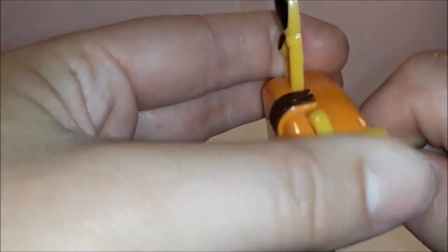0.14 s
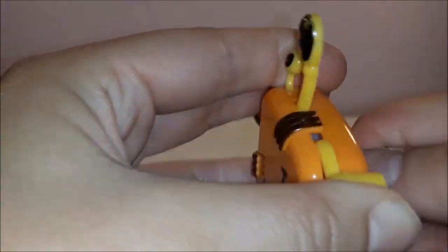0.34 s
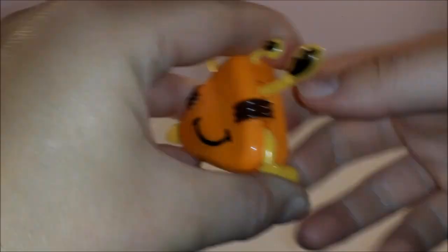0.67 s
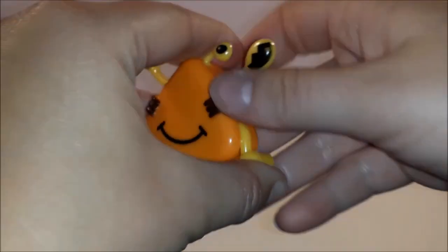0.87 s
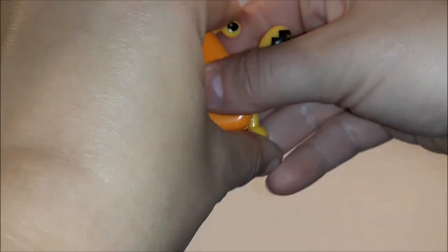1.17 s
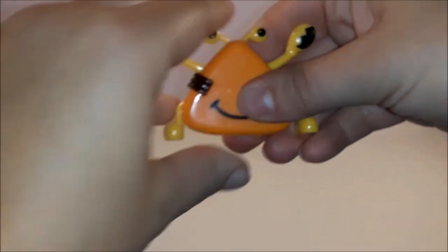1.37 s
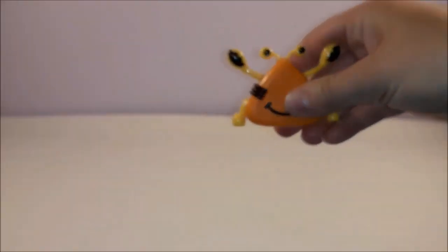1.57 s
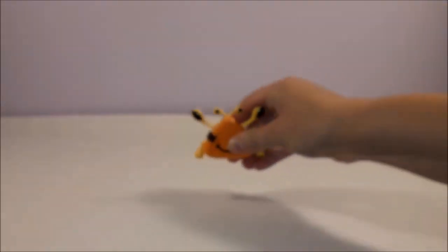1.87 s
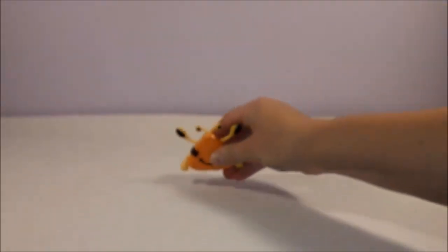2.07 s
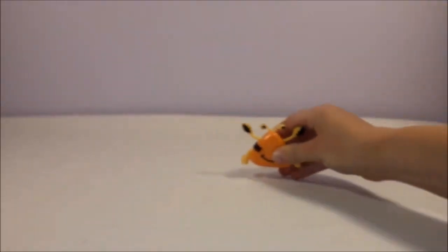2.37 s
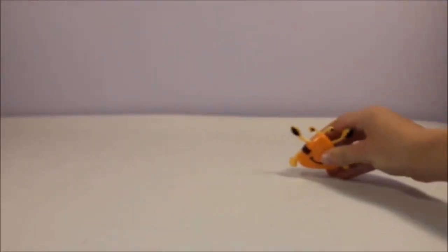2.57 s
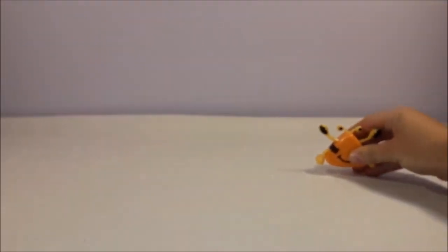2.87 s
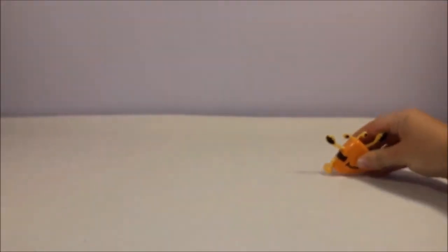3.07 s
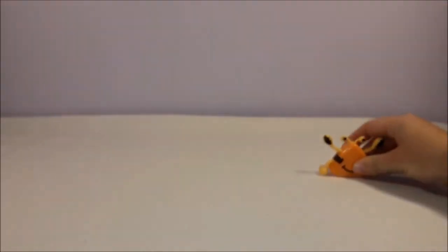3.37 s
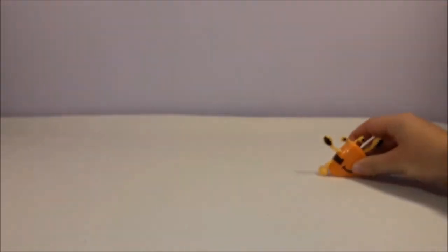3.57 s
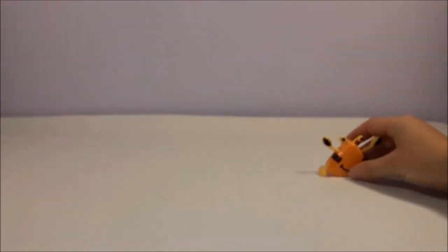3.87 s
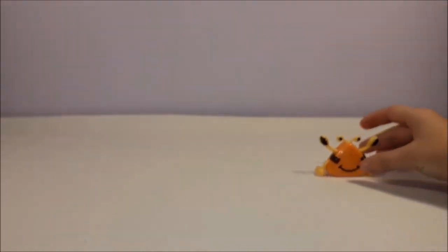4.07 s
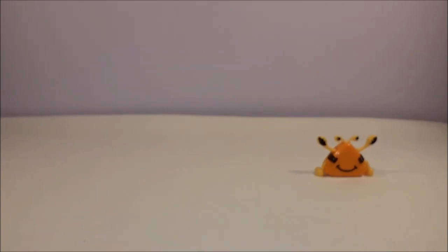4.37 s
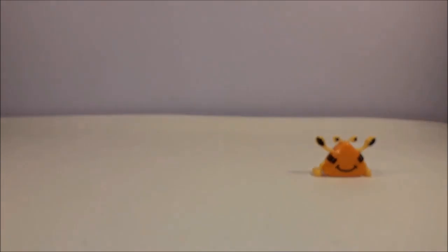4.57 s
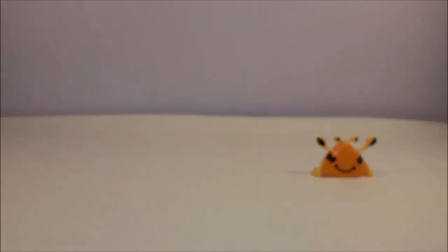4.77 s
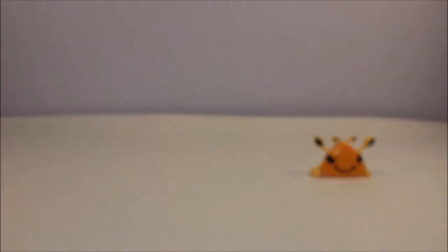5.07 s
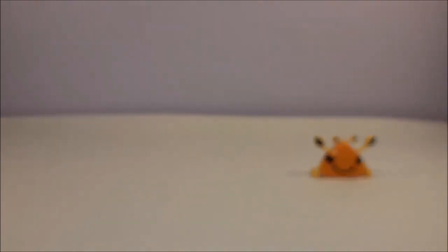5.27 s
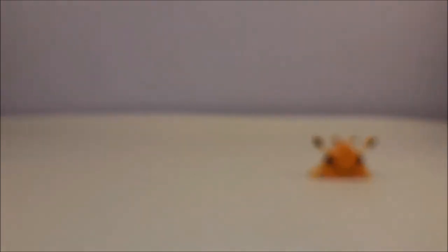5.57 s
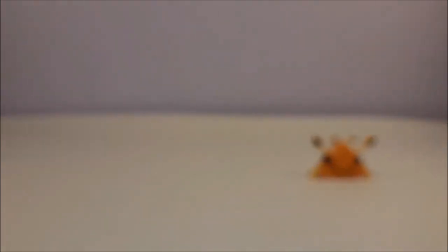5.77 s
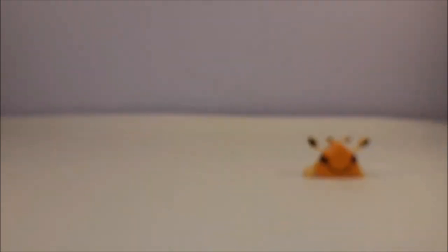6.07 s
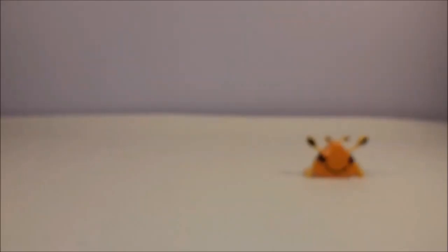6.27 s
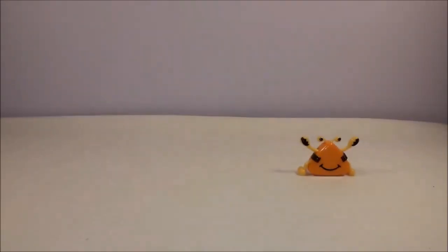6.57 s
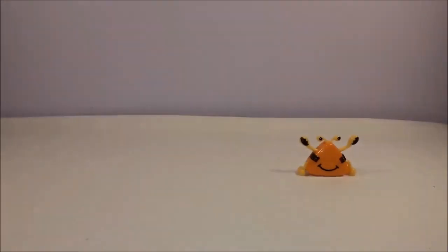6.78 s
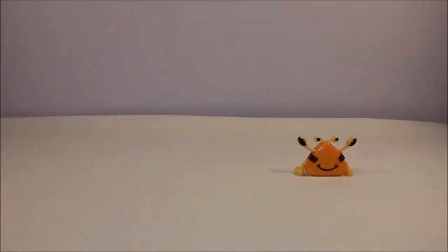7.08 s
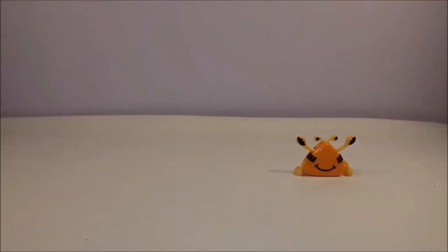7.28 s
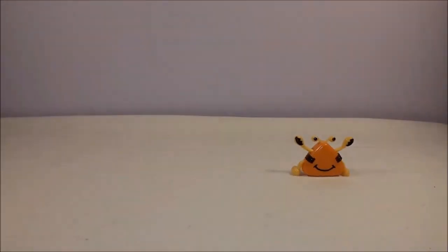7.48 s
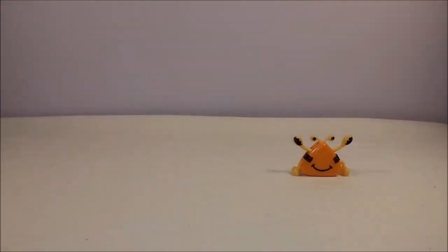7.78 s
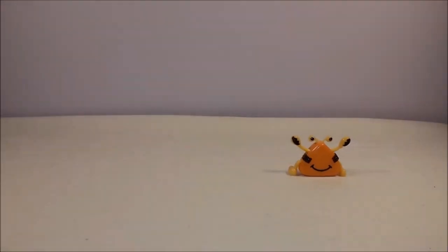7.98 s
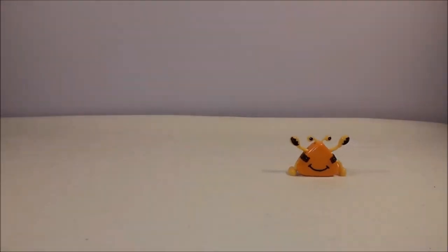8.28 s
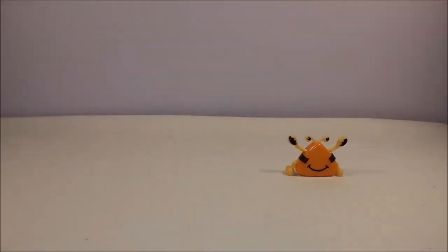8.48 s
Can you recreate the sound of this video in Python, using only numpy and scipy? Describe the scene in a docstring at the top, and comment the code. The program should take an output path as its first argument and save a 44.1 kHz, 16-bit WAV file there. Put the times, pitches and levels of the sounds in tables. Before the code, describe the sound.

A small plastic wind-up toy is ratcheted close by, chatters and spurts in the fingers, then whirs steadily on a table in a quiet room.

```python
"""In a small, quiet room a plastic clockwork toy is wound close to the microphone: a pawl cracks over ratchet teeth.
Held in the fingers, its gears slip in noisy chatters, its case creaks and its motor spurts as the grip loosens.
Set on a table, its feet groan and it runs free: an escapement strikes the hollow case about a thousand times
a second, slowing a little as the spring unwinds, while a cam works the limbs about twice a second.
Soft knocks, brushed limbs and faint room air surround it."""
import sys
import numpy as np
from scipy import signal
from scipy.fft import rfft, irfft
from scipy.io import wavfile
from scipy.ndimage import uniform_filter1d, map_coordinates

SR = 44100
rng = np.random.default_rng(int(sys.argv[2]) if len(sys.argv) > 2 else 0)


def wav_out(sig):
    """Save sig, one row per channel (or a flat mono array), as 16-bit PCM at SR to the path in sys.argv[1]."""
    wavfile.write(sys.argv[1], SR, np.round(np.clip(np.atleast_2d(sig).T, -1, 1) * 32767).astype(np.int16))


N = 381024
TIME = np.arange(N) / SR  # seconds
BINS = np.maximum(np.arange(2049) * SR / 4096, 1)  # filter frequencies in Hz, kept above zero for the logarithm

# The free run: start, time to get going, and when the fingers begin and finish letting go, all in seconds.
START_S, SPIN_UP_S, LET_GO_S = 3.646, 0.068, (3.55, 4)
# Peak and half-width of each swell, in shares of a cam turn.
RASP_AT, RASP_WIDTH = 0.003, 0.044
LOAD_AT, LOAD_WIDTH = -0.089, 0.15
SWING_AT, SWING_WIDTH = 0.091, 0.2
RETURN_AT, RETURN_WIDTH = 0.66, 0.16

# Spectrum of the cam's rasp. Each row: frequency in Hz, gain in dB.
RASP_SPECTRUM = [(200, -73), (500, -61), (900, -26), (1300, -25.5), (1650, -5.5), (1950, -16), (2300, 1.5),
                 (2700, 2.5), (3300, 8.5), (3900, -56), (6000, -15)]
# Spectrum of the loaded gears' hum. Each row: frequency in Hz, gain in dB.
HUM_SPECTRUM = [(300, -39), (600, -29), (800, -8), (990, -4.5), (1250, -13.5), (1550, -10), (1900, -8),
                (2600, -22)]
# The cam lifts the limbs, one row a turn.
# Each row: time in seconds, rasp in dB against a usual turn, limb ring in dB against a usual turn.
CAM_TURNS = [(3.5, -20, -4), (3.969, 1, 2.5), (4.449, 1, -0.5), (4.908, 2, -3), (5.389, 0, 2.5),
             (5.88, 4.5, 2.5), (6.37, -1, -1), (6.861, 1, -0.5), (7.349, 1, -2.5), (7.851, 0.5, -3.5),
             (8.378, -0.5, 0.5), (8.9, -2, -1)]


def free_run(strikes, rasp_db=-38, idle_rasp_db=-15, hum_db=-65, idle_load_db=-12,
             murmur_db=-62, murmur_db_per_s=-3.0, swing_db=-41, limb_return_db=-39.0,
             limb_hz=3980, limb_width_hz=450, whine_db=-46, whine_db_per_s=0.63, shudder_db=-0.38):
    """The standing toy whirrs; each cam turn loads the gears into a hum, rasps, and rings a limb out and back."""
    _, lift_db, limb_db = np.transpose(CAM_TURNS)
    elapsed = np.maximum(TIME - START_S, 0)
    chatter = grain(rattle(strikes, loose=4.0), depth_db=2.5, rate=35)

    lift = each_turn(RASP_AT, RASP_WIDTH, lift_db) + undb(idle_rasp_db)
    rasp = unit(colour(chatter, RASP_SPECTRUM)) * undb(rasp_db) * lift

    load = each_turn(LOAD_AT, LOAD_WIDTH) + undb(idle_load_db)
    backlash = 1 + 2.5 * walk(110)
    hum = unit(colour(strikes * backlash, HUM_SPECTRUM)) * load * undb(hum_db + 1.2 * walk(32))

    # A side wall buzzes while the spring is tight.
    murmur = ring(chatter, 1637, 193) * undb(murmur_db + murmur_db_per_s * elapsed)

    swing_out = each_turn(SWING_AT, SWING_WIDTH, limb_db + swing_db)
    swing_back = each_turn(RETURN_AT, RETURN_WIDTH, limb_return_db)
    limb = ring(chatter, limb_hz, limb_width_hz) * (swing_out + swing_back)

    # A narrow whine of the case near 3.4 kHz slowly grows.
    whine = ring(chatter, 3372, 88) * undb(whine_db + whine_db_per_s * elapsed + 1.16 * walk(20))

    held = np.interp(TIME, LET_GO_S, [1, 0])
    spin_up = np.sqrt(np.minimum(elapsed / SPIN_UP_S, 1))
    running = spin_up * dips() * undb(shudder_db * walk(80))
    standing_parts = (1 - held) * (rasp + hum + whine)
    return running * (whirr(strikes, np.sqrt(held)) + limb + murmur + rock(chatter) + standing_parts)


# The cavity fades as the spring unwinds: level at the start of the run, then change per second.
CAVITY_DB, UNWIND_DB_PER_S = -40, -0.63
# Level of the whirr before trims. Each row: time in seconds, shell in dB, tooth sizzle in dB.
WHIRR_LEVELS = [(3.69, -32.0, -38.5), (3.86, -30, -33), (4.0, -33, -36), (4.45, -32.5, -35),
                (4.8, -33.0, -36.5), (5.0, -34, -34.5), (5.6, -36.0, -36.5), (5.72, -34, -35),
                (5.82, -37, -37.5), (5.92, -33, -39.0), (6.1, -38.5, -39), (6.25, -35.0, -36),
                (6.7, -33.0, -36.0), (7.2, -33.5, -36.0), (8.0, -34.5, -37), (8.6, -35.5, -37.5)]
# Spectrum of the case standing free. Each row: frequency in Hz, gain in dB.
FREE_CASE_SPECTRUM = [(700, -41), (1200, -38.5), (1850, -26.5), (2200, -16.5), (2600, -7), (3100, -10.5),
                      (4400, -3.5), (5000, -3), (6200, -0.5), (7750, 4.5), (8700, -13.5), (10200, -7.5),
                      (12000, -4), (15800, -8.5)]
# Narrow rings of the case. Each row: frequency in Hz, width in Hz, height over the rest in dB.
CASE_RINGS = [(2300, 50, 8.5), (5530, 86, 2.5), (6280, 160, 5.5), (7170, 550, 1.5), (11600, 270, 1.5)]


def whirr(strikes, held, shell_db=-0.73, teeth_db=1.8, return_db=1.5,
          grip_db=2, grip_hz=6050, grip_width_hz=800):
    """Cavity, shell and teeth sound together; a grip adds a strong shell ring, and the limbs' return a swell."""
    source = grain(rattle(strikes, loose=.8), depth_db=2.3, rate=40, drift_db=1.6)
    cavity, shell, teeth = case_parts(colour(source, FREE_CASE_SPECTRUM, CASE_RINGS))
    shell_level, teeth_level = curve(WHIRR_LEVELS, TIME)
    grip = held * undb(grip_db)
    shell = (shell + grip * ring(source, grip_hz, grip_width_hz)) / np.hypot(1, grip)
    swell_db = return_db * each_turn(RETURN_AT, RETURN_WIDTH)
    return (cavity * undb(CAVITY_DB + UNWIND_DB_PER_S * (TIME - START_S))
            + shell * undb(shell_level + shell_db + swell_db)
            + teeth * undb(teeth_level + teeth_db))


# Mean speed of the escapement. Each row: time in seconds, strikes a second in Hz.
STRIKE_RATE = [(0, 908.7), (3.6, 977.8), (4.0, 1033), (4.8, 1013), (5.8, 987), (6.3, 1011), (7.0, 986.3),
               (7.8, 972.8), (8.64, 953.5)]


def escapement(jitter=.06, scatter_db=3, limp_db=-2.0, waver=.02):
    """Two pallets strike in turn, one a little harder; loose gears scatter time and force."""
    drift = unit(uniform_filter1d(rng.standard_normal(N), SR // 60))
    rate_hz = curve(STRIKE_RATE, TIME)[0] * (1 + waver * drift)
    phase = np.cumsum(rate_hz) / SR  # counts strikes
    k = np.arange(1, int(phase[-1]))
    chance = rng.standard_normal((len(k), 2))
    # Jitter is a share of the gap between strikes.
    place = np.interp(k + jitter * chance[:, 0], phase, np.arange(N)).astype(int)
    force = undb(scatter_db * chance[:, 1] + limp_db * (-1) ** k)
    return np.bincount(place, force, N)


def rattle(strikes, loose=.7, t60=0.045):
    """Every strike is followed by the tiny rebounds of loose teeth, a decaying burst of noise."""
    rebounds = signal.fftconvolve(strikes, fade(TIME[:SR // 50], t60))[:N] * rng.standard_normal(N)
    return unit(strikes) + loose * unit(rebounds)


def case_parts(x):
    """Air cavity, shell and teeth radiate low, middle and high bands, crossing over at 5 and 9 kHz."""
    spectrum, hz = rfft(x), np.arange(N // 2 + 1) * SR / N
    above_5k, above_9k = [np.clip((hz - edge) / 800 + .5, 0, 1) for edge in (5000, 9000)]
    shares = (1 - above_5k, above_5k - above_9k, above_9k)
    return [unit(irfft(spectrum * share, N)) for share in shares]


def turns():
    """Turns of the cam, counted from its first row."""
    return np.interp(TIME, [row[0] for row in CAM_TURNS], np.arange(len(CAM_TURNS)))


def each_turn(at, width, strength_db=0):
    """One swell at the same place in every turn of the cam, each as strong as its turn."""
    turn = turns() - at
    nearest = np.clip(np.round(turn), 0, len(CAM_TURNS) - 1).astype(int)
    strengths = undb(strength_db + np.zeros(len(CAM_TURNS)))
    return bump(turn - nearest, width) * strengths[nearest]


DIP_S = 0.01  # half-width of a dip
# The whole run dips for an instant. Each row: time in seconds, depth in dB.
LEVEL_DIPS = [(4.688, -6), (5.838, -4), (7.08, -4), (7.12, -4.5), (7.548, -14), (7.95, 0), (8.354, -5),
              (8.588, -0.5)]


def dips():
    """Brief dips in the level of the run."""
    coarse = TIME[::32]
    depth = sum(depth_db * bump(coarse - s, DIP_S) for s, depth_db in LEVEL_DIPS)
    return undb(np.interp(TIME, coarse, depth))


# The toy rocks once on its feet: middle and half-width in seconds.
ROCK_S, ROCK_WIDTH_S = 5.95, 0.088
# Rings freed by the rocking. Each row: frequency in Hz, width in Hz, level in dB.
FREED_RINGS = [(4310, 660, -35), (7310, 550, -36.5)]


def rock(source):
    """The case rings more freely while the toy rocks."""
    rings = sum(ring(source, hz, width) * undb(db) for hz, width, db in FREED_RINGS)
    return bump(TIME - ROCK_S, ROCK_WIDTH_S) * rings


SPURT_ATTACK_S, SPURT_T60_S = 0.0091, 0.1
# The motor spurts while the grip is loose. Each row: start in seconds, length in seconds,
# shell level at the crest in dB before a common gain, swell to the crest in dB, cavity against shell in dB,
# teeth against shell in dB, ring of the freed panel in Hz, that ring against shell in dB.
MOTOR_SPURTS = [(0.623, 0.04, -29.5, 3.5, -9, -2, 10600, 1), (0.907, 0.081, -32.5, 1.5, -7.5, -3, 3030, -4),
                (1.305, 0.1, -33, 3.5, -6, 3, 6100, 0), (1.424, 0.17, -30, 6.5, -6.5, 3, 7530, 4),
                (3.236, 0.05, -32, 5.5, -7.5, -2.5, 2270, -13),
                (3.423, 0.027, -41, 1.5, -7, -4.5, 2280, -25)]
# Spectrum of the case held in the fingers. Each row: frequency in Hz, gain in dB.
HELD_CASE_SPECTRUM = [(410, -85), (700, -27.5), (1550, -31), (1740, -21), (2290, -11.5), (2610, -15),
                      (3260, -10), (3720, -13), (4180, -7), (6260, -7), (6770, -3.5), (7320, -6),
                      (8900, -16.5), (12800, -5), (15800, -15)]


def spurts(strikes, gain_db=1.3, ring_width_hz=520, sizzle_hz=12700, sizzle_db=-1.5):
    """A looser grip lets the motor start, swell and be braked again; the freed panel rings at the crest."""
    source = grain(rattle(strikes, loose=2.9), depth_db=3.2, rate=60, drift_db=1.5)
    held_rings = [(2273, 330, 3.5), (sizzle_hz, 900, sizzle_db)]
    held_case = colour(source, HELD_CASE_SPECTRUM, held_rings)
    parts = np.array(case_parts(band(held_case, 1500, "high")))
    panel_drive = rattle(strikes, loose=3.4)
    out, t = np.zeros(N), TIME[:SR // 2]
    for s, length, db, swell_db, cavity_db, teeth_db, ring_hz, ring_db in MOTOR_SPURTS:
        now = slice(int(s * SR), int(s * SR) + len(t))
        cavity, shell, teeth = parts[:, now]
        arch = np.sin(np.pi * np.clip(t / length, 0, 1) ** 1.43)
        attack = np.clip(t / SPURT_ATTACK_S, 0, 1)
        braking = fade(np.maximum(t - length, 0), SPURT_T60_S)
        force = attack * braking * undb(db + swell_db * (arch - 1))
        panel = ring(panel_drive[now], ring_hz, ring_width_hz) * arch ** 2 * undb(ring_db)
        add(out, s, force * (shell + undb(cavity_db) * cavity + undb(teeth_db) * teeth + panel))
    return out * undb(gain_db)


# Ratchet clicks of the key. Each row: start in seconds, relative level in dB, pawl ring in Hz, case ring in Hz.
RATCHET_CLICKS = [(0.3032, -10, 7210, 4210), (0.328, -8.5, 7920, 4350), (0.3707, -8.5, 7470, 4297),
                  (0.408, -8.5, 7940, 4000), (0.4324, -11, 7720, 4340), (0.4569, -11, 7650, 4000),
                  (0.4814, -11, 7570, 4050), (0.5076, -8.5, 7640, 4080), (0.534, -11.5, 7820, 3960),
                  (0.5703, -12.5, 7630, 4070)]
# Spectrum of the pawl's crack. Each row: frequency in Hz, gain in dB.
PAWL_SPECTRUM = [(470, -66.5), (800, -30.5), (1630, -41), (2340, -19), (3580, -17.5), (4050, -7),
                 (6040, -18.5), (7660, -5.5), (9830, -18.5), (15800, -15)]


def ratchet(t60=0.012, rise_s=0.00059, gain_db=1):
    """The pawl drops off each tooth with a crack; the gripping fingers damp the case and shift its rings."""
    out, t = np.zeros(N), TIME[:SR // 20]
    for s, db, pawl_hz, case_hz in RATCHET_CLICKS:
        crack = rng.standard_normal(len(t)) * fade(t, t60) * (1 - np.exp(-t / rise_s))
        click = colour(crack, PAWL_SPECTRUM, [(pawl_hz, 600, 4), (case_hz, 900, 1)])
        add(out, s, unit(click) * undb(db + gain_db - 23.5))
    return moving_room(band(out, 2500, "high", order=2), wet_db=-9, t60=0.12)


# The gears slip by a few teeth in the fingers.
# Each row: start in seconds, relative level in dB, t60 in seconds, treble in dB.
GEAR_SLIPS = [(0.21, -16, 0.028, -16), (0.683, -22, 0.051, 0), (0.739, -29, 0.033, -7),
              (0.791, -24.5, 0.046, -5), (0.883, -44, 0.03, -12), (1.06, -38, 0.096, 4),
              (1.076, -35.5, 0.061, -16), (1.163, -32.5, 0.0091, -61), (1.198, -40, 0.019, -12),
              (1.215, -48.5, 0.044, 1), (1.742, -33, 0.066, -1), (1.876, -36.5, 0.023, -5.5),
              (2.122, -37.5, 0.095, 6), (2.249, -59, 0.29, 17), (2.311, -33, 0.05, -4),
              (2.571, -36.5, .08, 10), (2.629, -41.5, 0.076, -3), (2.673, -35.5, 0.083, 11),
              (2.693, -35.5, 0.097, 5), (2.815, -47.5, 0.067, 7.5), (3.08, -56.5, 0.04, -26),
              (3.561, -49, 0.096, -8)]
# Spectrum of slipping gears, also heard in the creak. Each row: frequency in Hz, gain in dB.
SLIP_SPECTRUM = [(470, -75), (800, -42), (918, -5), (1130, -31.5), (2010, -21), (2430, -3), (2860, -12),
                 (3240, -2.5), (3620, -7), (3900, -5.5), (4710, -5), (7290, 2), (8790, -12.5), (12300, -4),
                 (15800, -16)]


def slips(gain_db=-2, snap_db=0, snap_t60=0.0035, rise_s=0.00053):
    """The gears snap free and chatter about a millisecond apart, dying away as the fingers catch them again."""
    out, t = np.zeros(N), TIME[:SR // 6]
    for s, db, t60, treble_db in GEAR_SLIPS:
        chatter = rng.standard_normal(len(t)) * np.exp(-1.5 * (t * STRIKE_RATE[0][1] % 1))
        rings = [(13400, 19000, treble_db), (2130, 200, 4.4), (7300, 1100, 1.8)]
        body = unit(colour(chatter, SLIP_SPECTRUM, rings))
        decay = fade(t, t60) + undb(snap_db) * fade(t, snap_t60)
        force = decay * (1 - np.exp(-t / rise_s))
        add(out, s, body * force * undb(db + gain_db))
    return moving_room(band(out, 1600, "high"), wet_db=-7, t60=0.18)


# The creak: from and to in seconds, mean ticks a second, level in dB, treble in dB.
CREAK_S, CREAK_PER_S, CREAK_DB, CREAK_TREBLE_DB = (2.33, 2.43), 92, -45.5, -19


def creak(scatter_db=4, t60=0.015):
    """Small uneven ticks, placed at random, as the case shifts in the fingers."""
    start, end = CREAK_S
    during = (TIME > start) * (TIME < end)
    ticks = (rng.random(N) < CREAK_PER_S / SR) * undb(scatter_db * rng.standard_normal(N)) * during
    sound = colour(rattle(ticks, loose=2.7, t60=t60), SLIP_SPECTRUM, [(13400, 20000, CREAK_TREBLE_DB)])
    share = np.sqrt(abs(end - start) * SR / N)  # makes the level that of the creak, not of the whole scene
    return moving_room(band(sound, 1400, "high") * share * undb(CREAK_DB), wet_db=0, t60=0.35)


# A limb is brushed. Each row: start in seconds, level in dB.
LIMB_TAPS = [(3.079, -54.5), (3.11, -61)]


def taps(hz=2330, width_hz=320, t60=0.097):
    """A brushed limb rings as a small pitched tick, made of narrow fading noise."""
    out, t = np.zeros(N), TIME[:SR // 6]
    for s, db in LIMB_TAPS:
        add(out, s, ring(rng.standard_normal(len(t)), hz, width_hz) * fade(t, t60) * undb(db))
    return out


# The feet rub on the table as the fingers let go.
# Each row: time in seconds, pitch in Hz, relative level in dB.
FEET_RUB = [(3.65, 378, -83), (3.68, 430, -61), (3.72, 398, -64), (3.765, 412, -54), (3.86, 527, -72)]


def rub(overtone_db=-3, gain_db=-1):
    """The feet stick and slip with a rough, rising groan: a tone and its octave, unsteady in strength."""
    hz, db = curve(FEET_RUB, TIME)
    phase = 2 * np.pi * np.cumsum(hz) / SR
    groan = walk(160) * np.sin(phase) + undb(overtone_db) * walk(260) * np.sin(2 * phase)
    return groan * undb(db + gain_db) * (TIME > FEET_RUB[0][0]) * (TIME < FEET_RUB[-1][0])


# Soft knocks of fingers and feet.
# Each row: start in seconds, relative level in dB, pitch in Hz, t60 in seconds.
SOFT_KNOCKS = [(0.326, -56, 440, 0.3), (0.327, -62, 218, 0.27), (0.33, -62, 890, 0.29),
               (1.961, -74, 800, 0.21), (3.24, -45, 348, 0.2), (3.246, -59.5, 160, 0.22),
               (3.425, -59, 453, 0.3), (4.97, -70, 276, 0.23), (7.645, -68, 700, 0.24)]


def knocks(rise_s=0.0024, gain_db=3):
    """Fingertips and feet land softly and thud, each a band of noise that rises gently and fades."""
    out, t = np.zeros(N), TIME[:SR // 3]
    for s, db, hz, t60 in SOFT_KNOCKS:
        thud = unit(band(rng.standard_normal(len(t)), [hz * 0.72, hz * 1.35], "band", order=3))
        add(out, s, thud * fade(t, t60) * (1 - np.exp(-t / rise_s)) * undb(db + gain_db))
    return out


AIR_DB = -72
# Spectrum of the room air. Each row: frequency in Hz, gain in dB.
AIR_SPECTRUM = [(15, -62), (25, -33), (91, -6), (174, -13), (222, -15.5), (248, -18), (307, -19.5),
                (542, -20.5), (604, -21.5), (881, -22.5), (1060, -23.5), (1590, -25.5), (15800, -29.5)]


def air():
    """Faint room rumble and hiss, as steady coloured noise."""
    return unit(colour(rng.standard_normal(N), AIR_SPECTRUM)) * undb(AIR_DB)


def moving_room(x, wet_db, t60, rate=5):
    """As the toy moves, its sound takes ever different paths through the room: six tails, shifting in weight."""
    t = TIME[:SR // 3]
    weights = np.array([walk(rate) for _ in range(6)])
    wet = 0
    for weight in weights / np.linalg.norm(weights, axis=0):
        tail = rng.standard_normal(len(t)) * fade(t, t60)
        wet = wet + signal.fftconvolve(x * weight, tail / np.linalg.norm(tail))[:N]
    return (x + undb(wet_db) * wet) / np.hypot(1, undb(wet_db))


def grain(x, depth_db=1.5, rate=22, drift_db=2.5, drift_rate=6):
    """Loose parts touch and part, so neighbouring resonances flicker and drift on their own."""
    spacing = 300  # Hz between independent resonances
    hz, t, cells = signal.stft(x, SR, nperseg=512)
    gain_db = 0
    for db, per_s in (depth_db, rate), (drift_db, drift_rate):
        chance = rng.standard_normal((SR // spacing, 1024))
        where = np.meshgrid(hz / spacing, t * per_s, indexing="ij")
        gain_db = gain_db + db * map_coordinates(chance, where, order=3, mode="wrap")
    return signal.istft(cells * undb(gain_db), SR)[1][:N]


def ring(x, hz, width):
    """One resonance with steep sides, at an rms of one."""
    return unit(band(x, [hz - width / 2, hz + width / 2], "band", order=2))


def walk(rate):
    """Smooth chance that changes about rate times a second, spread one."""
    size = int(SR / rate)
    return unit(uniform_filter1d(uniform_filter1d(rng.standard_normal(N), size), size))


def bump(x, width):
    """A smooth hill of height one around zero."""
    return np.exp(-(x / width) ** 2)


def undb(db):
    """Decibels to gain."""
    return 10 ** (np.asarray(db) / 20)


def unit(x):
    """Scale to an rms of one."""
    return x / np.sqrt(np.mean(x ** 2))


def curve(rows, at):
    """Each column of a table after the first, joined by straight lines."""
    first, *columns = np.transpose(rows)
    return [np.interp(at, first, c) for c in columns]


def colour(x, points, rings=()):
    """Causal minimum-phase filter from a broad spectrum and resonances (Hz, width Hz, dB)."""
    hz, db = np.transpose(points)
    gain_db = np.interp(np.log(BINS), np.log(hz), db)
    for centre, width, height in rings:
        gain_db = gain_db + height / (1 + (2 * (BINS - centre) / width) ** 2)
    cepstrum = irfft(np.log(undb(gain_db)))
    half = len(cepstrum) // 2
    fold = np.r_[1, np.full(half - 1, 2), 1, np.zeros(half - 1)]
    response = irfft(np.exp(rfft(cepstrum * fold)))[:half]
    return signal.fftconvolve(x, response)[:len(x)]


def band(x, hz, kind, order=4):
    """Butterworth filter."""
    return signal.sosfilt(signal.butter(order, hz, kind, fs=SR, output="sos"), x)


def fade(t, t60):
    """Exponential decay by 60 dB in t60 seconds."""
    return np.exp(-np.log(1000) * t / t60)


def add(out, s, x):
    """Mix x into out from time s in seconds."""
    i = int(s * SR)
    out[i:i + len(x)] += x[:len(out) - i]


def scene():
    """Winding, handling and the free run in one room."""
    strikes = escapement()
    motor = moving_room(spurts(strikes) + free_run(strikes), wet_db=-6.0, t60=0.16)
    handling = ratchet() + slips() + creak() + taps()
    return (handling + motor + knocks() + rub() + air())[None]


TOP_HZ = 15800


def record(dry):
    """The recorder cuts the top with a steep low-pass."""
    return signal.sosfilt(signal.ellip(10, .2, 70, TOP_HZ, fs=SR, output="sos"), dry)


dry = scene()
out = record(dry)
wav_out(out)
```